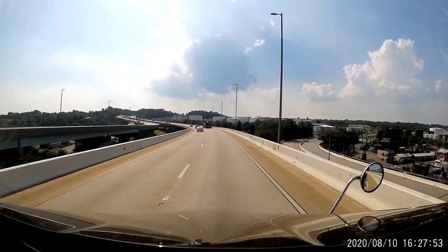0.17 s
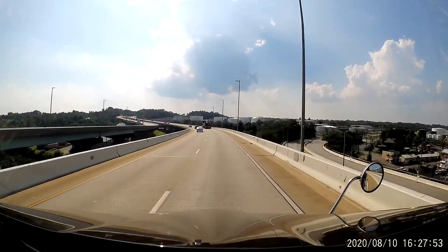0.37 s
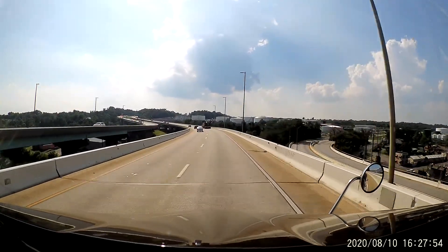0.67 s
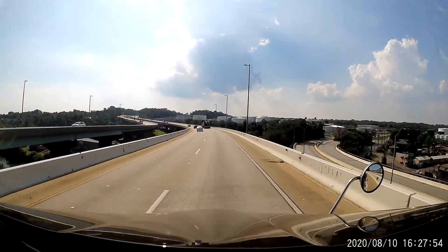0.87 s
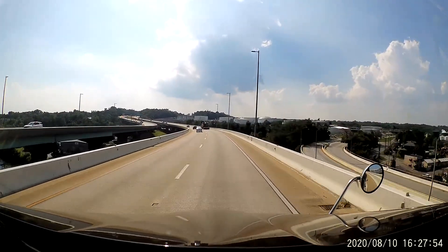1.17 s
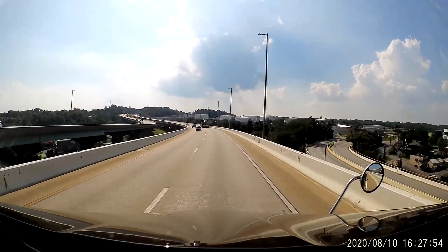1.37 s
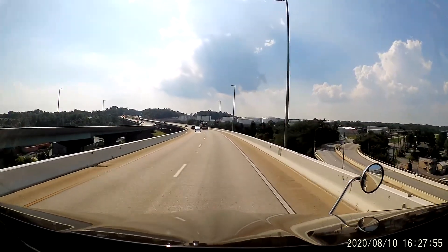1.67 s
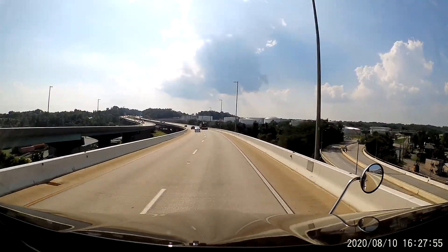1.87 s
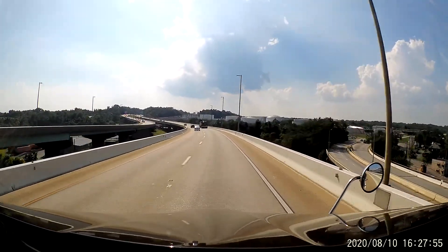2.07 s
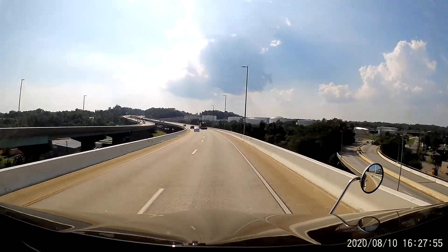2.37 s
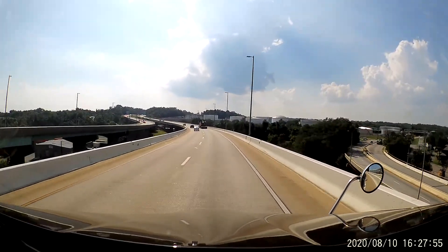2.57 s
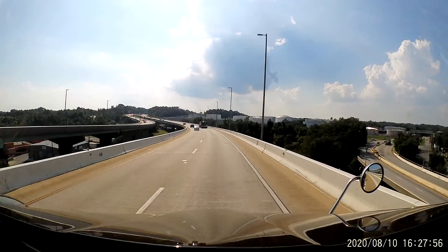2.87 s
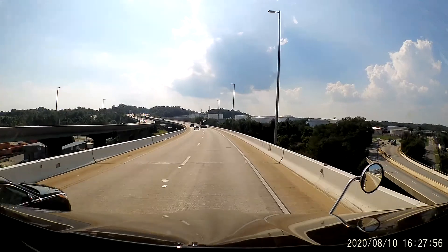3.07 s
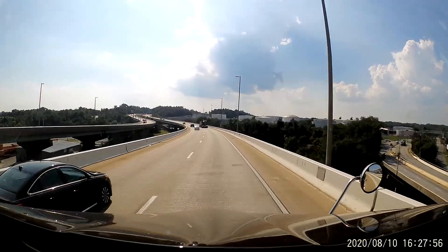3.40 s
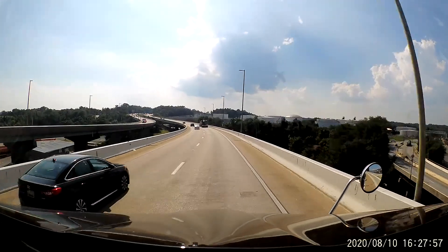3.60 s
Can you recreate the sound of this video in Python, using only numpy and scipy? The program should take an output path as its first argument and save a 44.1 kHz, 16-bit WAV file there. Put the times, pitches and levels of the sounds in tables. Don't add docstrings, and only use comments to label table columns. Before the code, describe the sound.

Continuous bass-heavy driving rumble inside a vehicle cab on a concrete viaduct, with uneven booming, panel drumming and muted wind and tyre hiss. Engine hum is light at first, then strengthens from about 0.9 to 2 seconds, its pitch rising slightly. Bumps cluster around 0.8-1.4 seconds, with more near 2.6 and 3.4. Faint trim ticks; a heavy low thump around 3.7. Muffled mono camera microphone.

```python
import sys
import numpy as np
from scipy import signal
from scipy.io import wavfile

SR = 44100
rng = np.random.default_rng(int(sys.argv[2]) if len(sys.argv) > 2 else 0)


def transcribe(signal):
    frames = np.atleast_2d(signal).T
    limited = np.clip(frames, -1, 1)
    pcm = np.round(limited * 32767).astype(np.int16)
    wavfile.write(sys.argv[1], SR, pcm)


def boost(x):
    u = np.asarray(x, float) / 20
    return 10 ** u


N = 164934


def rms_one(x):
    return x / np.sqrt(np.mean(x ** 2) + 1e-20)


def in_time(rows):
    s, *columns = np.transpose(rows)
    return [np.interp(np.arange(N) / SR, s, column) for column in columns]


def drift(rate_hz):
    pole = np.exp(-80 * np.pi * rate_hz / SR)
    noise = rng.standard_normal(N // 40 + 4002)
    slow = signal.lfilter([1], [1, -2 * pole, pole * pole], noise)[4000:]
    return np.interp(np.arange(N) / 40, np.arange(len(slow)), rms_one(slow))


def resonate(x, hz, width_hz):
    r = np.exp(-np.pi * width_hz / SR)
    turn = 2 * np.pi * hz / SR
    return signal.lfilter([(1 - r * r) / 2, 0, (r * r - 1) / 2], [1, -2 * r * np.cos(turn), r * r], x)


def tone(hz):
    cycles = np.cumsum(hz * np.ones(N)) / SR + rng.random()
    return np.sqrt(2) * np.sin(2 * np.pi * cycles)


def banded_noise(spectrum, patchy_db):
    hz, db = np.transpose(spectrum)
    edges = 3 * 2 ** np.arange(0, 11.9, 1 / 3)
    out, together = 0, drift(10)
    white = rng.standard_normal((2, N + SR))
    for k, (low, high) in enumerate(zip(edges, edges[1:])):
        level_db = np.interp(np.log(low * high) / 2, np.log(hz), db, left=-90, right=-90)
        if level_db > -80:
            band_filter = signal.butter(2, [low, high], "band", fs=SR, output="sos")
            band = signal.sosfilt(band_filter, white[k % 2])[SR:]
            flicker_db = patchy_db * (0.17 * together + drift(13.2))
            out = out + boost(level_db + flicker_db) * band
    return rms_one(out)


def wind_and_tyres(air_db):
    # (pitch [Hz], level per Hz [dB])
    hiss_spectrum = [(600, -37), (900, 1.5), (1400, -9), (2100, -16.5), (2950, -26), (4000, -21.5),
                     (5000, -34.5), (8600, -26)]
    return boost(air_db + 2.5) * banded_noise(hiss_spectrum, patchy_db=0.86)


def road_rumble(air_change_db):
    # (pitch [Hz], level per Hz [dB])
    rumble_spectrum = [(4, -11.5), (15, 0), (130, -0.5), (275, -7), (375, -8), (600, -10), (1310, -39.5),
                       (1950, -57.5)]
    rumble = boost(-21 + 0.56 * air_change_db) * banded_noise(rumble_spectrum, patchy_db=-0.04)
    dip_share = .6
    return rumble - dip_share * resonate(rumble, 125, 30)


def rattles():
    # (time [s], peak level [dB], length [s], level of the lower ring [dB])
    rattle_events = [ (0.073, -53, 0.0068, -8), (0.124, -52, .005, -2), (.178, -54, 0.0025, -6.5),
                     (0.368, -60, 0.0051, -4), (0.415, -57, 0.0065, -4), (0.423, -56.5, 0.0045, 0),
                     (0.427, -52, 0.012, 4), (0.449, -58.5, .006, 5.5), (.542, -52, .007, -17),
                     (0.67, -53.5, .005, 1), (0.733, -48, 0.0041, -5), (0.739, -52, 0.0031, 7),
                     (0.748, -48.5, 0.0046, 0), (0.761, -54, 0.011, -8), (.783, -52, .010, -2),
                     (0.936, -59.5, 0.0032, -2), (1.468, -44.5, 0.0045, -6), (1.478, -47, .005, -3),
                     (1.522, -47, 0.0047, 6), (1.527, -48, 0.0078, -2), (1.543, -51.5, .006, 3),
                     (1.847, -53.5, .012, -2), (2.302, -49, 0.0072, -2), (3.295, -53, .012, -2),
                     (3.617, -48.5, 0.0043, -1)]
    # (pitch [Hz], width [Hz], level [dB])
    trim_rings = [
        (3800, 900, 2.5),
        (5600, 1400, -2),
        (7200, 1800, 0),
    ]
    t = np.arange(N) / SR
    rise_s = .0006
    high = low = boost(-66 + 2.3 * drift(22))
    for s, db, length_s, low_db in rattle_events:
        u = np.maximum(t - s, 0)
        fade = np.exp(-(u / (1.3 * length_s)) ** 2)
        shape = boost(db + 2.0) * (1 - np.exp(-u / rise_s)) * fade
        high = high + shape
        low = low + shape * boost(low_db)
    sizes = boost(2.2 * np.minimum(rng.exponential(1, N), 3))
    happens = rng.random(N) < 8000 / SR
    ticks = rms_one(happens * sizes * rng.choice([-1, 1], N))
    rings = []
    for hz, width_hz, db in trim_rings:
        ring = resonate(resonate(ticks, hz, width_hz), hz, 2 * width_hz)
        rings.append(boost(db) * rms_one(ring))
    return .55 * (high * (rings[1] - rings[2]) - low * rings[0])


def engine():
    # (time [s], rate [Hz])
    firing_rate = [(0, 46.9), (1.3, 47.75), (2.0, 48.15), (2.8, 48.6), (3.74, 49.0)]
    # (time [s], level [dB])
    load_curve = [
        (0, -12.5),
        (.9, -4),
        (1.25, -2),
        (2.0, 0.2),
        (2.8, -1),
        (3.74, -0.1),
    ]
    # (multiple of the firing rate, level [dB rms])
    hum_lines = [(1, -30), (1.4, -37), (2, -37), (4, -35), (6.5, -29.5), (8.08, -41)]
    hum_trims = [0.11, .1, .1, 0.11, 0.08, .1]
    # (time [s], pitch [Hz], level [dB])
    turbo_whistle = [
        (2.8, 7380, -90),
        (2.92, 7420, -74),
        (3.2, 7530, -73),
        (3.4, 7590, -88),
    ]
    (firing_hz,), (load_db,) = in_time(firing_rate), in_time(load_curve)
    wander = 1 + .001 * drift(4)
    hum = 0
    for (multiple, db), trim_db in zip(hum_lines, hum_trims):
        wobble_db = 1.2 * drift(3.2)
        hum = hum + boost(db + trim_db + load_db + wobble_db) * tone(multiple * firing_hz * wander)
    turbo_hz, turbo_db = in_time(turbo_whistle)
    return hum + boost(turbo_db) * tone(turbo_hz)


def thumps():
    # (time [s], peak level [dB], pitch [Hz], time to fade by 60 dB [s])
    joint_knocks = [ (3.665, -1, 38, .12), (.78, -14, 31, .45), (.89, -11, 95, .5), (1.245, -6.5, 330, .14),
                    (2.54, -17, 240, .35), (2.69, -10, 250, .2), (3.36, -17, 158, .35), (1.4, -12, 196, .5),
                    (3.45, -17, 205, .35), (2.05, -26, 680, .35), (3.66, -14, 320, .25),
                    (3.665, -13, 190, .2), (1.02, -13, 38, .3), (1.1, -18, 70, .4)]
    t, out = np.arange(N) / SR, 0
    for s, db, hz, t60 in joint_knocks:
        u = np.maximum(t - s, 0)
        rise = 1 - np.exp(-u / (.06 * t60))
        out = out - boost(db - 60 * u / t60) * rise * np.sin(2 * np.pi * hz * u)
    return out


def swelling(swells, rest_db, wobble_hz):
    t = np.arange(N) / SR
    s, _, _, hz = np.transpose(swells)
    swell = sum(boost(db) * np.exp(-.5 * ((t - at) / width) ** 2) for at, db, width, _ in swells)
    pitch_hz = np.interp(t, s, hz) + wobble_hz * drift(9.7)
    return (boost(rest_db) + swell) * tone(pitch_hz)


def cab(air_change_db):
    # (time [s], top level [dB rms], half width [s], pitch [Hz])
    boom_swells = [(.11, -14.5, 0.027, 125.4), (.24, -17.5, 0.039, 122.2), (.33, -17.5, 0.038, 120.8),
                   (.49, -23, 0.024, 122.3), (.72, -19, .04, 126.5), (.88, -26.5, 0.078, 120.5),
                   (1.12, -20, 0.016, 128), (1.221, -21, 0.02, 134), (1.309, -18, 0.019, 124.1),
                   (1.42, -24, 0.043, 127.3), (1.5, -28.5, 0.023, 125), (1.7, -27, 0.052, 127.7),
                   (1.83, -19.5, 0.026, 125.7), (2.02, -20.5, 0.046, 126.5), (2.18, -18, 0.013, 123),
                   (2.28, -14, 0.011, 127.4), (2.42, -23, 0.045, 122.4), (2.52, -25.5, 0.024, 123),
                   (2.63, -20.5, 0.021, 129), (2.715, -20, .03, 126.4), (2.8, -25, 0.013, 126),
                   (2.93, -27, 0.077, 124.4), (3.23, -23.5, 0.023, 121.2), (3.5, -25, 0.054, 126.5),
                   (3.7, -25, 0.017, 129.7)]
    # (time [s], top level [dB rms], half width [s], pitch [Hz])
    drum_swells = [(.01, -24, 0.016, 330), (.1, -30, 0.018, 338), (.2, -37.5, 0.051, 335),
                   (.32, -31, 0.045, 335), (.49, -28.5, 0.043, 329), (.61, -27, 0.039, 334),
                   (.76, -30, 0.016, 330), (.87, -29, 0.027, 337), (1.07, -38, 0.018, 333),
                   (1.17, -31, 0.012, 330), (1.4, -42.5, 0.045, 335), (1.56, -29, 0.02, 335),
                   (1.66, -31.5, 0.016, 332), (1.8, -28.5, 0.019, 335), (2.0, -33.5, 0.025, 330),
                   (2.2, -30, 0.034, 341), (2.43, -27, 0.027, 334), (2.68, -42, 0.024, 338),
                   (2.93, -28, 0.025, 336), (3.04, -33, 0.052, 333), (3.24, -34, 0.025, 340),
                   (3.38, -38, 0.048, 340), (3.72, -27, 0.043, 330)]
    # (pitch [Hz], width [Hz], level [dB rms])
    resonances = [(26.2, 19, -27.5), (91.7, 5.6, -33), (11, 10, -45), (163.4, 42, -29), (210.4, 27, -33),
                  (251.7, 15, -32), (346.5, 12, -38.5), (399.7, 29, -44.5), (474.4, 93, -42),
                  (594.7, 46, -39), (668.8, 22, -40.5), (788, 30, -42), (1190, 180, -51.5),
                  (1296, 63, -49.5), (2162, 56, -63.5), (2660, 110, -61), (3370, 260, -61.5),
                  (4225, 160, -62.5), (4480, 64, -70), (5400, 400, -65.5), (6230, 250, -72)]
    out = swelling(boom_swells, rest_db=-40, wobble_hz=2.5)
    out = out + swelling(drum_swells, rest_db=-33, wobble_hz=4)
    for hz, width_hz, db in resonances:
        shake = rng.standard_normal(N + SR)
        ring = resonate(resonate(shake, hz, 1.02 * width_hz), hz, 1.02 * width_hz)[SR:]
        follow_db = 1.5 * air_change_db * (hz > 4000)
        out = out + boost(db + follow_db) * rms_one(ring)
    return out


def scene():
    # (time [s], level [dB])
    airflow = [(0.0, -41), (1.47, -39.5), (1.91, -38.5), (3.74, -38)]
    air_db, = in_time(airflow)
    air_change_db = air_db - air_db.mean()
    background = wind_and_tyres(air_db) + road_rumble(air_change_db)
    mix = background + rattles() + engine() + thumps() + cab(air_change_db)
    return mix[None]


def band_limit(x):
    return signal.sosfilt(signal.butter(12, 8820, fs=SR, output="sos"), x)


def record(dry):
    # (pitch [Hz], level [dB rms])
    buzz_lines = [(7720, -84), (7663, -85)]
    camera_rate_hz, limit = 16000, .8
    limited = limit * np.tanh(dry / limit)
    x = signal.sosfilt(signal.butter(6, 7340, fs=SR, output="sos"), limited)
    x = x + sum(boost(db) * tone(hz) for hz, db in buzz_lines)
    x = signal.sosfilt(signal.ellip(12, .5, 60, camera_rate_hz / 2, fs=SR, output="sos"), x)
    top = signal.sosfilt(signal.butter(6, 6500, "high", fs=SR, output="sos"), x)
    x = x + 2 * top * np.cos(2 * np.pi * camera_rate_hz * np.arange(N) / SR)
    x = signal.sosfilt(signal.butter(24, 8046, fs=SR, output="sos"), x)
    return band_limit(x)


dry = scene()
out = record(dry)
transcribe(out)
```